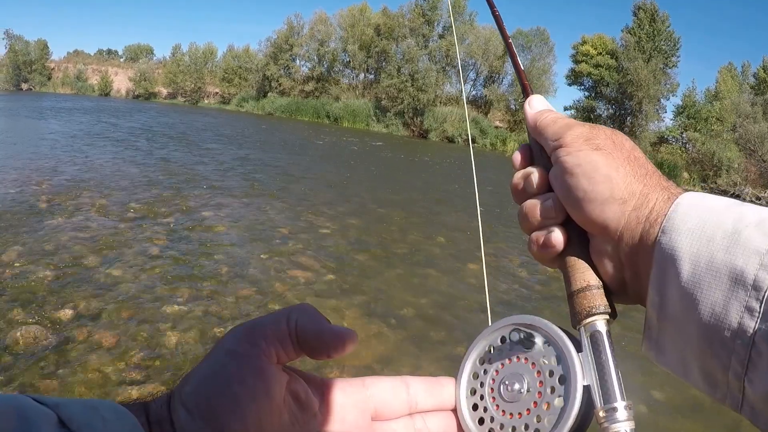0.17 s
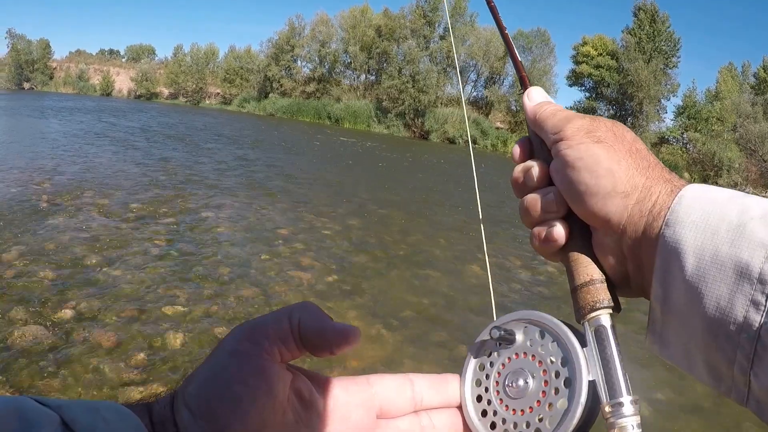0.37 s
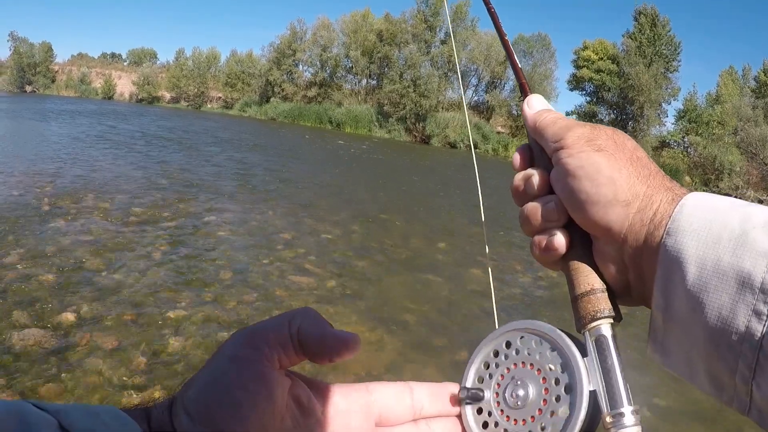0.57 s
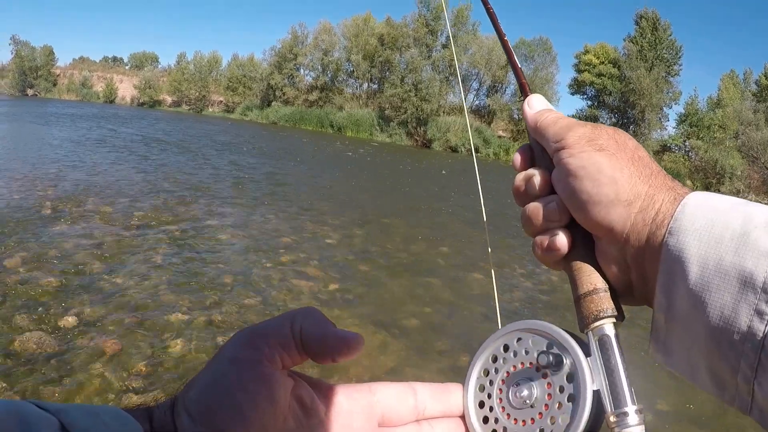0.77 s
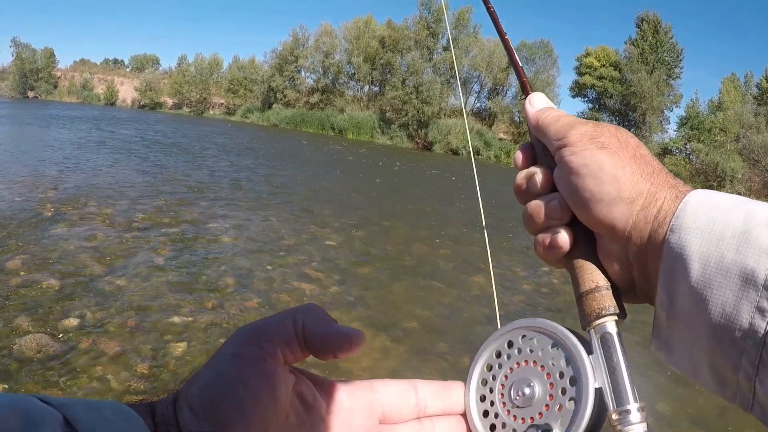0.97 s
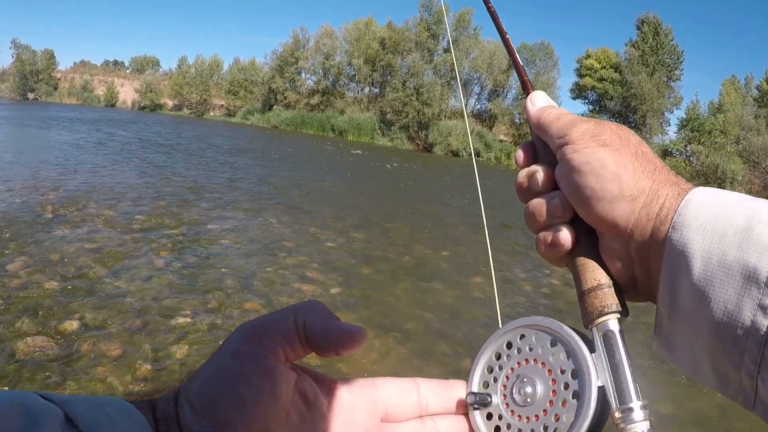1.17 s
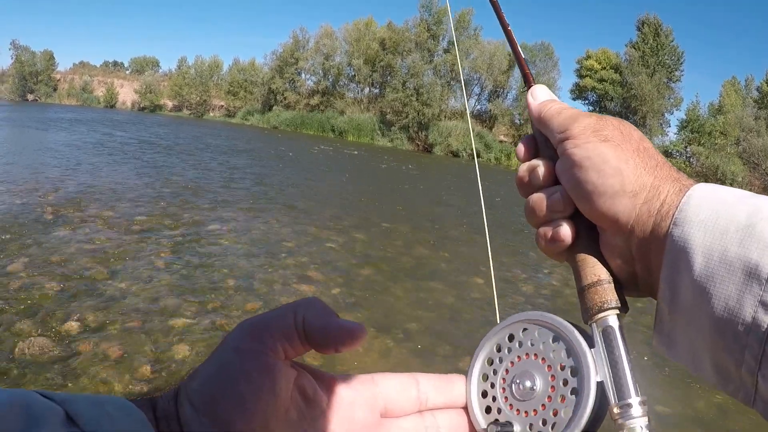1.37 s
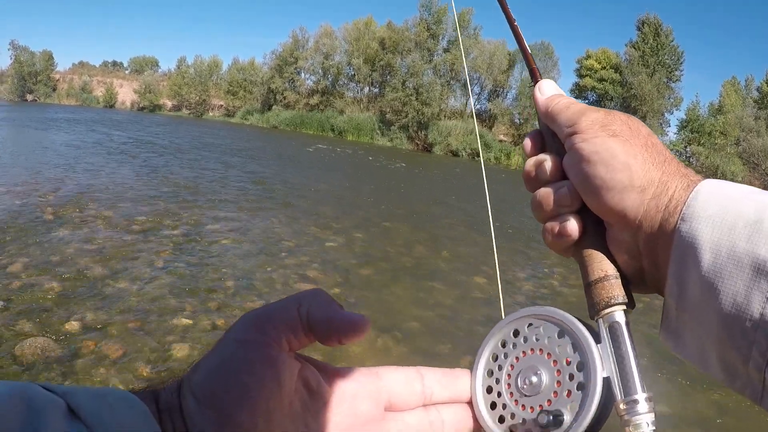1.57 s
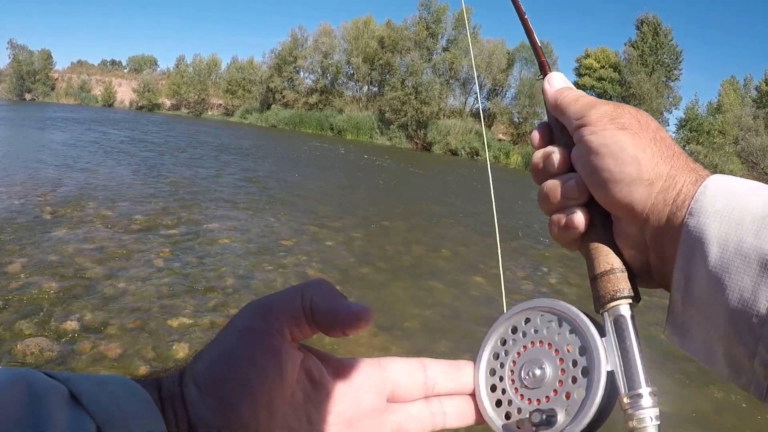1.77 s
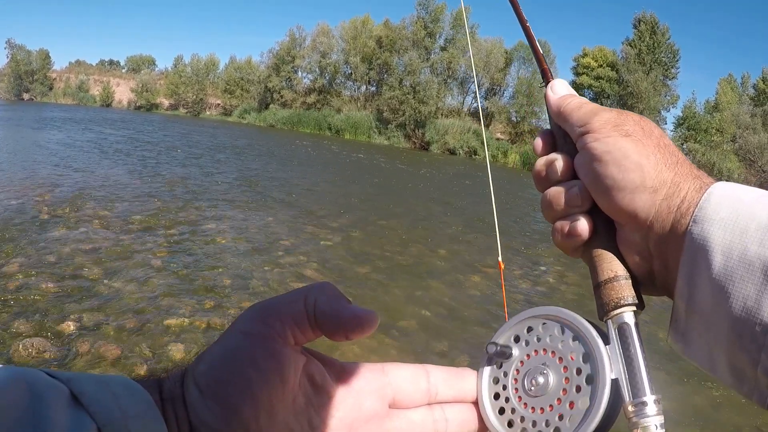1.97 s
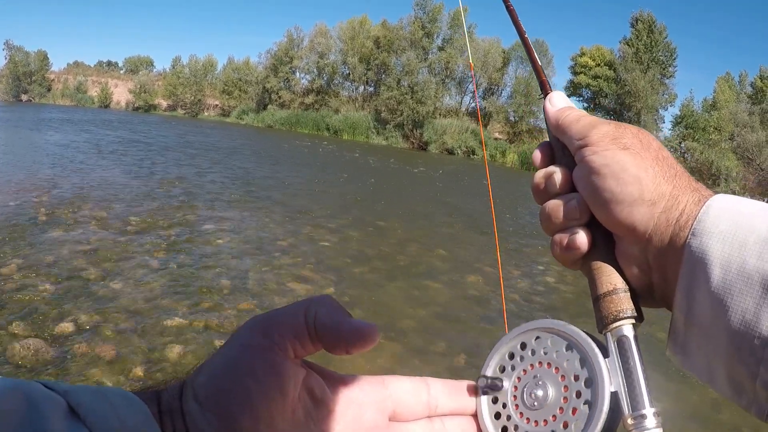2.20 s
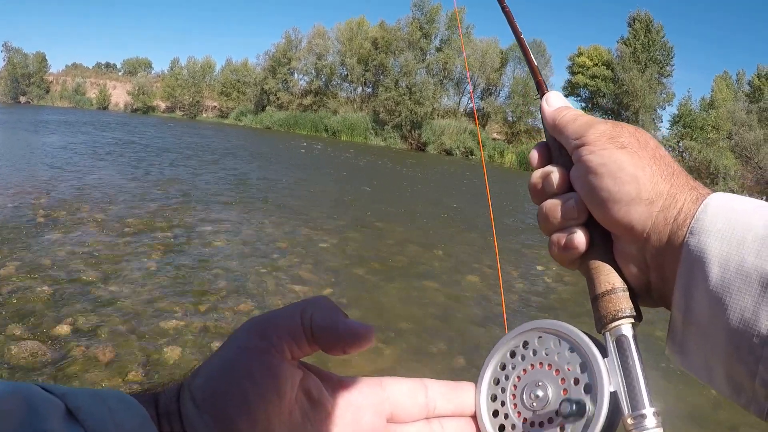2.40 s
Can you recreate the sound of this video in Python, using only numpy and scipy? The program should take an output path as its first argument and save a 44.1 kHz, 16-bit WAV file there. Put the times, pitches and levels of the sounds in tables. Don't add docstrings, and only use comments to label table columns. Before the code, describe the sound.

A click-and-pawl fishing reel buzzes loudly and unevenly as line runs out beside a river

```python
import sys
import numpy as np
from scipy import signal
from scipy.fft import rfft, irfft, next_fast_len
from scipy.io import wavfile
from scipy.ndimage import uniform_filter1d, map_coordinates

SR = 44100
rng = np.random.default_rng(int(sys.argv[2]) if len(sys.argv) > 2 else 0)


def log_audio(samples):
    frames = np.atleast_2d(samples).T
    limited = np.clip(frames, -1, 1)
    pcm = np.round(limited * 32767).astype(np.int16)
    wavfile.write(sys.argv[1], SR, pcm)


def ratio_of_db(decibels):
    return 10 ** (np.asarray(decibels, float) / 20)


N = 112014
TIME = np.arange(N) / SR


def unit(x):
    return x / np.sqrt(np.mean(x ** 2) + 1e-20)


def along(points, hz):
    f, value = np.transpose(points)
    return np.interp(np.log(hz + 1), np.log(f + 1), value, left=value[0])


def wobble(rate):
    knots = rng.standard_normal(int(N * rate / SR) + 4)
    return map_coordinates(knots, [np.arange(N) * rate / SR])


def filtered(x, response):
    m = next_fast_len(N + 8192)
    return irfft(rfft(x, m) * response(np.fft.rfftfreq(m, 1 / SR)), m)[..., :N]


TEETH = 64


def round_turn(orders, tooth):
    return sum(depth * np.cos(2 * np.pi * order * (tooth - peak) / TEETH) for order, depth, peak in orders)


# (time [s], speed [teeth/s])
PULL = [(-0.0144, 282.0), (0.1349, 264.0), (0.2747, 131.1), (0.3871, 268.0), (0.4815, 287.9),
        (0.8209, 164.9), (0.9831, 225.1), (1.0339, 184.4), (1.1598, 232.4), (1.2563, 144.0), (1.438, 152.0),
        (1.7358, 141.3), (1.7838, 218.9), (1.9118, 214.7), (2.0343, 339.1), (2.2328, 211.1),
        (2.4237, 269.8), (2.4911, 238.3)]
# (waves [per turn], speed squared [(teeth/s)^2], peak [tooth])
BINDING = [
    (1, -3891, 44.87),
    (2, -582, 79.69),
    (3, -9424, 13.9),
]
SLOWEST = 50


def tooth_times():
    s, speed = np.transpose(PULL)
    times = [0.]
    while times[-1] < N / SR:
        square = np.interp(times[-1], s, speed) ** 2 + round_turn(BINDING, len(times) - 1)
        times.append(times[-1] + 1 / np.sqrt(max(square, SLOWEST ** 2)))
    return np.array(times)


def impulses(s, size):
    return np.bincount(np.clip(np.round(s * SR).astype(int), 0, N), size, N + 1)[:N]


LEAD_S, JITTER_S = .0015, .00012
RISE_S, FALL_S = .0004, .0022
SCRAPE_DB, SCRAPE_GROWS = -13.5, 1.1


def pawl_rattle(start, size, speed_db):
    t = np.arange(SR // 50) / SR
    burst = (1 - np.exp(-t / RISE_S)) * np.exp(-(t / FALL_S) ** 2)
    bursts = np.convolve(impulses(start, size), burst)[:N]
    return unit(bursts) + ratio_of_db(SCRAPE_DB + SCRAPE_GROWS * speed_db)


# (frequency [Hz], width [Hz], left [dB], right [dB], left lead [rad])
FRAME = [(1695, 67, -11.5, -8.5, 1.64), (2188, 82, -7, -8, 1.6), (2535, 81, -16, -7, 1.2),
         (2834, 89, -4.5, -4, 0.95), (3190, 330, -10, -3.5, -0.2), (3740, 83, -2.5, -1.5, 0.34),
         (3933, 200, -0.8, -0.04, 0.68), (4370, 620, -12.5, -12, 1.07), (6270, 447, -5.5, -6.5, -0.76),
         (7340, 1240, -11.5, -17, 2.6), (7436, 380, -3, -12, 3.5), (8260, 200, -24.5, -6.5, 2.5),
         (9005, 273, -11.5, -8, -1.5), (12300, 3600, -35, -39, -1.5)]
# (waves [per turn], depth [dB], peak [tooth])
LOW_PART = [(2, 1.0, 31.6)]
SIDE_PLATE = [(1, 0.57, 17), (2, 1.34, 3.1), (3, 0.61, 7.6), (4, 0.61, 5.1), (5, 0.61, 5.7)]
SPOOL_RIM = [(2, 1.54, 27), (3, 1.7, 8.9), (8, 0.2, 1.27)]
HIGH_PART = [(2, 0.9, 17)]
PARTS_HZ = [2700, 3500, 4600, 7900]
STRIKE_S, STRIKE_DB, SMEAR_S = .0008, -5.5, .0009
SCATTER_DB, HARDER = 1.1, -0.1
OWN = 0.52
PLATE_GROWS = 0.1
BODY_LAG_S = .0007
SNAP_DB = -20


def reel():
    times = tooth_times()
    chance = rng.standard_normal((len(times), 2))
    snap_speed_db = 20 * np.log10(1 / np.gradient(times) / 200)
    size = ratio_of_db(SCATTER_DB * chance[:, 0] + HARDER * snap_speed_db)
    start = times - LEAD_S + JITTER_S * chance[:, 1]
    speed_db = np.interp(TIME, times, snap_speed_db)
    rattle = pawl_rattle(start, size, speed_db)

    tooth = np.interp(TIME, times, np.arange(len(times)))
    parts = [ratio_of_db(round_turn(part, tooth)) for part in (LOW_PART, SIDE_PLATE, SPOOL_RIM, [], HIGH_PART)]
    parts[1] = parts[1] * ratio_of_db(PLATE_GROWS * speed_db)

    instants = rng.random((len(times), len(FRAME)))
    shared = rng.standard_normal(N)
    ringing = 0
    for k, (hz, width, left_db, right_db, lead) in enumerate(FRAME):
        strike = ratio_of_db(STRIKE_DB) * unit(impulses(start + STRIKE_S + SMEAR_S * instants[:, k], size))
        noise = np.sqrt(1 - OWN) * shared + np.sqrt(OWN) * rng.standard_normal(N)
        force = rattle * noise + strike
        if hz < PARTS_HZ[2]:
            force = np.roll(force, round(BODY_LAG_S * SR))
        drive = force * parts[np.searchsorted(PARTS_HZ, hz)]
        left, right = ratio_of_db(left_db) * np.exp(.5j * lead), ratio_of_db(right_db) * np.exp(-.5j * lead)
        ports = (-1) ** k * np.array([[left], [right]])
        ringing = ringing + filtered(
            drive, lambda f: ports * 1j * f * width / (hz * hz - f * f + 1j * f * width))
    return ratio_of_db(SNAP_DB) * unit(ringing)


# (frequency [Hz], density [dB per Hz])
RIVER = [(110, -23.5), (200, -7.5), (420, -2.5), (700, -4.5), (1200, -7.5), (2500, -24.5), (6000, -25),
         (15000, -23)]
# (frequency [Hz], correlation [-1 to 1])
RIVER_ALIKE = [(150, 0.66), (300, 0.44), (500, 0.71), (750, -0.21), (1300, -0.12), (4000, 0.51)]
RIVER_DB, PATCH_DB = -32, 2


def river_rush():
    z = signal.stft(rng.standard_normal((2, N + 512)), nperseg=512)[2]
    patches = uniform_filter1d(rng.standard_normal(z.shape[1:]), size=4, axis=0)
    patches = uniform_filter1d(patches, size=8, axis=1)
    pair = signal.istft(z * ratio_of_db(PATCH_DB * unit(patches)), nperseg=512)[1][:, :N]

    def mid_side(hz):
        angle = np.arccos(np.clip(along(RIVER_ALIKE, hz), -1, 1)) / 2
        return ratio_of_db(along(RIVER, hz)) * np.array([np.cos(angle), np.sin(angle)])

    mid, side = filtered(pair, mid_side)
    return ratio_of_db(RIVER_DB) * unit(np.array([mid + side, mid - side]))


BUBBLES, GURGLE_DB = 150, -46.5


def river_gurgle():
    s, chance, left_share = rng.random((3, BUBBLES))
    hz = 520 * np.exp(0.27 * rng.standard_normal((BUBBLES, 1)))
    t = np.arange(2000) / SR
    envelope = ratio_of_db(-60 * t * hz / 14) * (1 - np.exp(-t / 0.0058))
    pops = np.sin(2 * np.pi * hz * t * (1 + 4 * t)) * envelope * -np.log(chance)[:, None]
    at = ((s * N).astype(int)[:, None] + np.arange(2000)).ravel()
    gurgle = [np.bincount(at, (pops * np.sqrt(share)[:, None]).ravel(), N)[:N]
              for share in (left_share, 1 - left_share)]
    return ratio_of_db(GURGLE_DB) * unit(np.array(gurgle))


# (time [s], level [dB])
WIND = [(0.0, -47), (0.06, -33.5), (0.15, -42.5), (0.41, -44), (0.43, -49), (0.49, -40.5), (0.68, -49),
        (1.15, -45), (1.17, -58), (1.24, -38.5), (1.53, -44), (2.54, -50.5)]
# (frequency [Hz], density [dB per Hz])
GUST = [(12, -30), (20, 3), (43, 1.5), (118, -6.5), (160, 2.5), (260, -21.5), (340, -20), (570, -120)]
LUMP_DB = 2


def wind_rumble():
    s, level_db = np.transpose(WIND)
    rumble = unit(filtered(rng.standard_normal((2, N)), lambda hz: ratio_of_db(along(GUST, hz))))
    lumpy = unit(rumble * ratio_of_db(LUMP_DB * np.array([wobble(13.1), wobble(14)])))
    return lumpy * ratio_of_db(np.interp(TIME, s, level_db) + [[6], [1.5]])


# (time [s], peak level [dB], frequency [Hz], left over right [dB])
THUDS = [(0.029, -10, 280, 7), (0.078, -31.5, 64.6, 8), (0.47, -14, 183, 3), (0.678, -11.5, 540, 2.0),
         (0.71, -13.5, 412, 8), (1.107, -15.5, 330, 6), (1.159, -13.5, 441, 9), (1.216, -21, 161, 21),
         (1.248, -33, 41.5, 15), (1.31, -27, 43, 14), (1.322, -26.5, 40.4, 7.0), (1.389, -39, 40.4, 4.5),
         (1.449, -31, 40.4, 6), (1.793, -24.5, 157, -10), (2.34, -26, 157, 2.5), (2.477, -23, 177, 12)]
THUD_CYCLES, THUD_RISE_S, THUD_LAG_S = 6.3, 0.0044, 0.00802


def wind_thuds():
    out = np.zeros((2, N + SR))
    t = np.arange(SR // 5) / SR
    for s, db, hz, pan_db in THUDS:
        envelope = ratio_of_db(-60 * t * hz / THUD_CYCLES) * (1 - np.exp(-t / THUD_RISE_S))
        thud = np.sin(2 * np.pi * hz * t) * envelope
        first = round((s + THUD_LAG_S) * SR)
        out[:, first:first + len(t)] += ratio_of_db(db + 5.5 + np.array([[pan_db / 2], [-pan_db / 2]])) * thud
    return out[:, :N]


def scene():
    return reel() + river_rush() + river_gurgle() + wind_rumble() + wind_thuds()


def low_pass(x):
    return signal.sosfilt(signal.butter(12, 15730, fs=SR, output="sos"), x)


# (frequency [Hz], gain [dB])
CAPSULE = [(9300, 0.34), (10800, -5.5), (11400, -3.5), (12200, 1.5), (13500, -4.5), (14300, -17),
           (15050, 0), (15350, -22)]


def record(dry):
    mix = filtered(dry, lambda hz: ratio_of_db(along(CAPSULE, hz)))
    return low_pass(mix)


dry = scene()
out = record(dry)
log_audio(out)
```